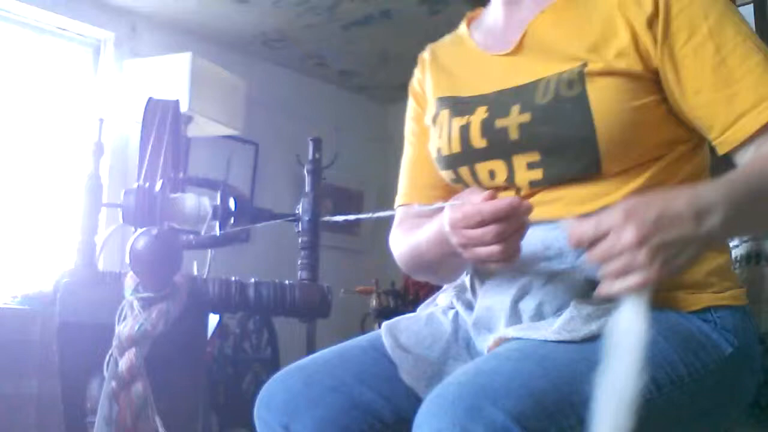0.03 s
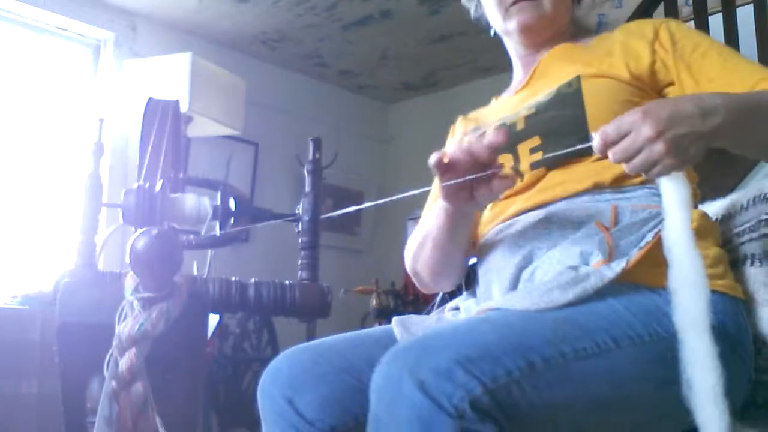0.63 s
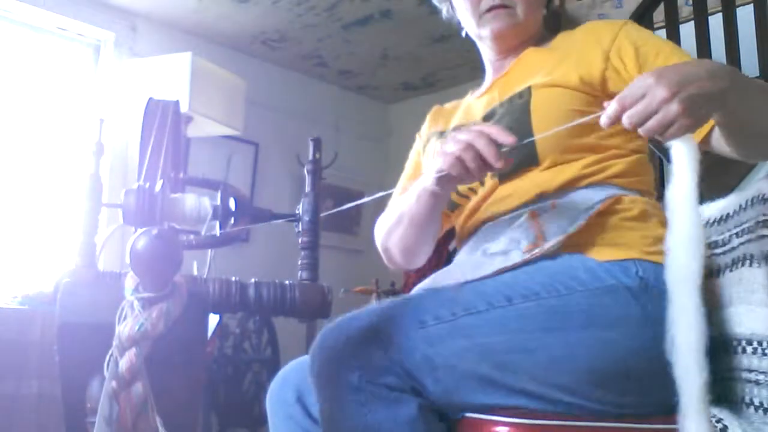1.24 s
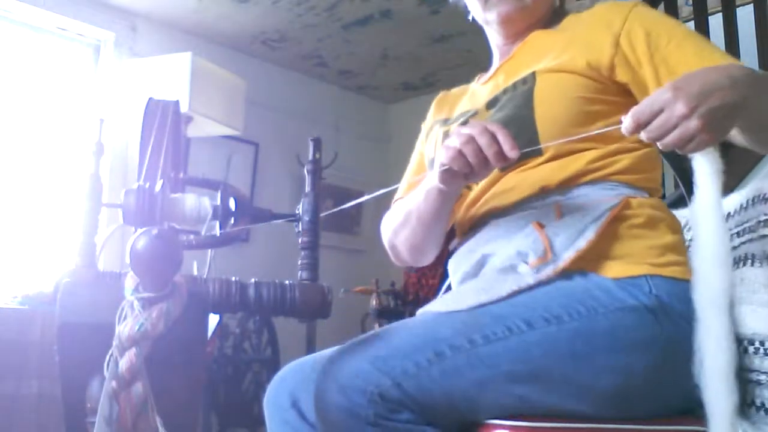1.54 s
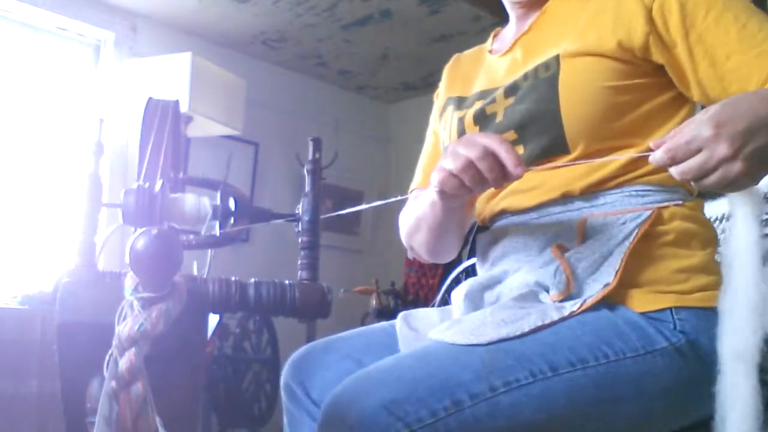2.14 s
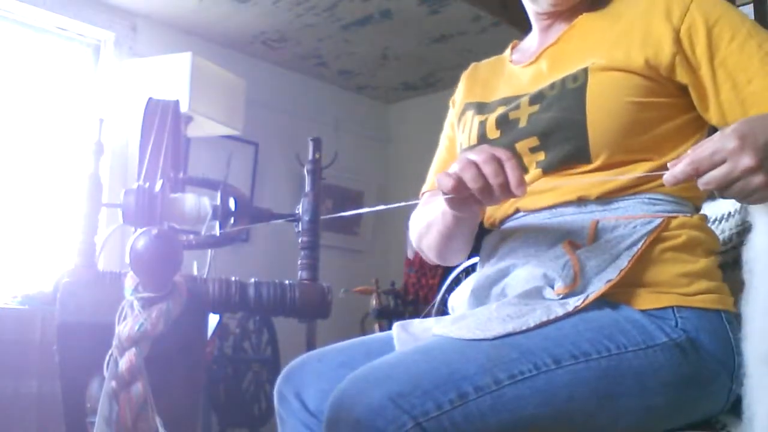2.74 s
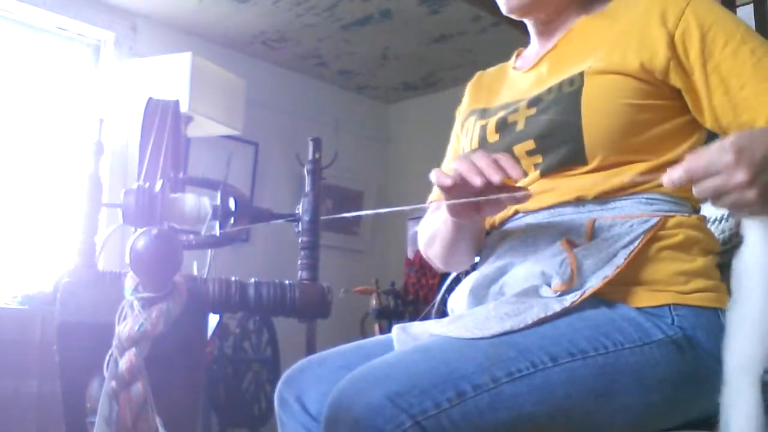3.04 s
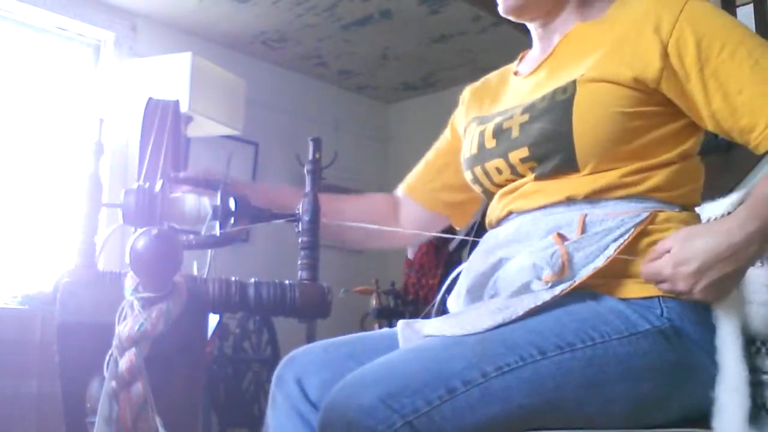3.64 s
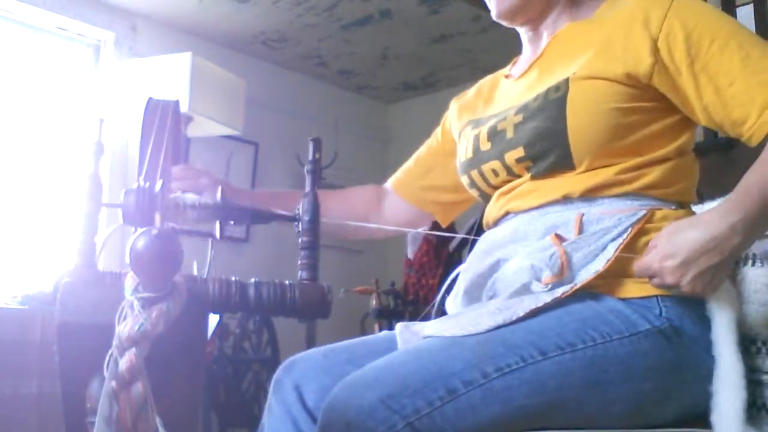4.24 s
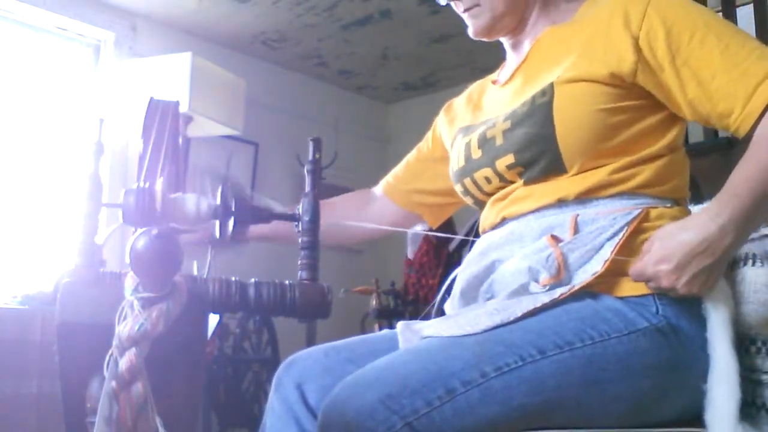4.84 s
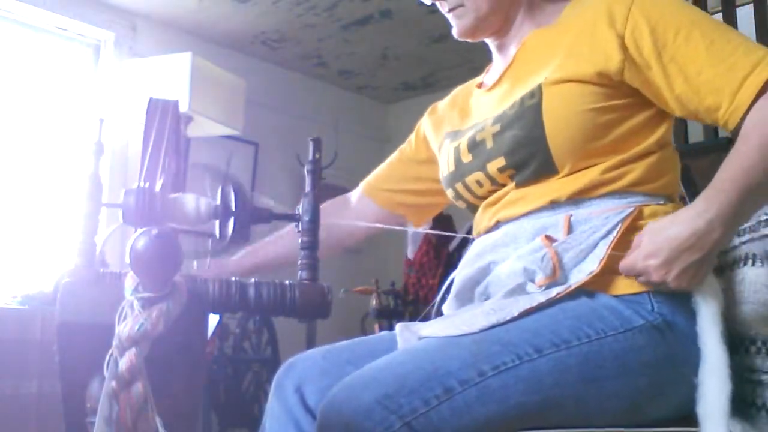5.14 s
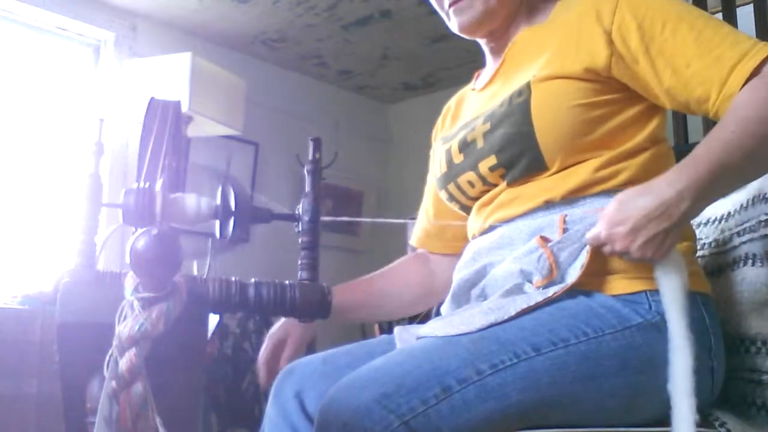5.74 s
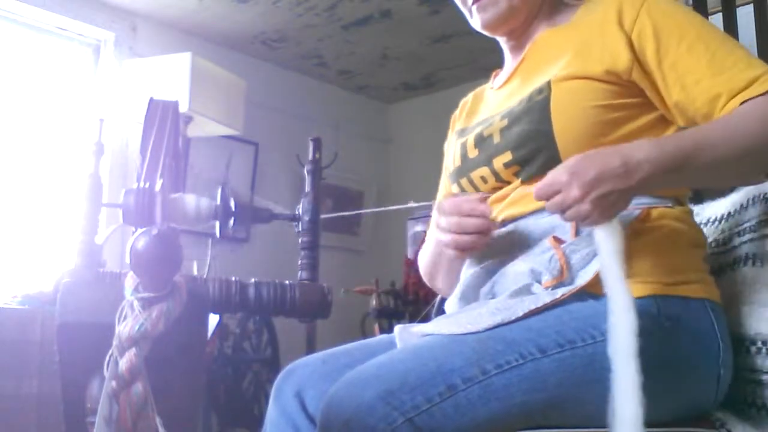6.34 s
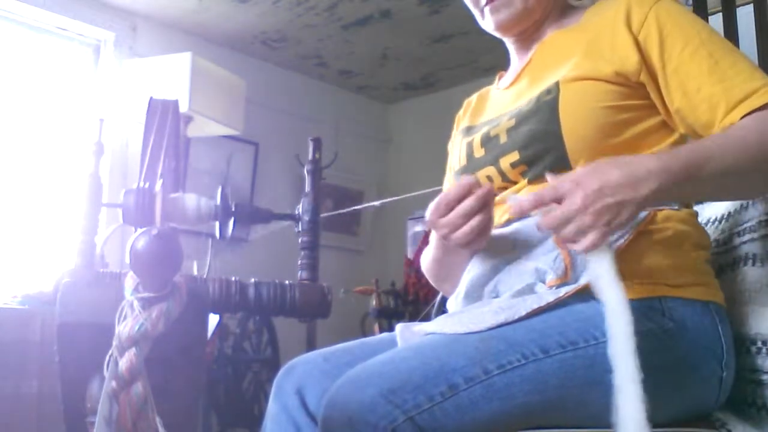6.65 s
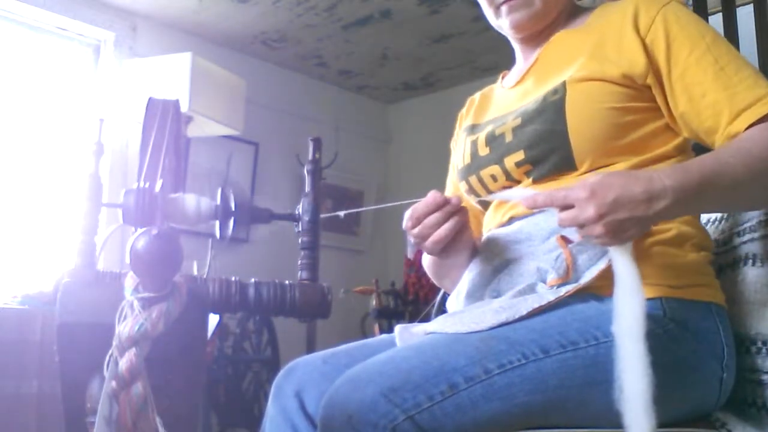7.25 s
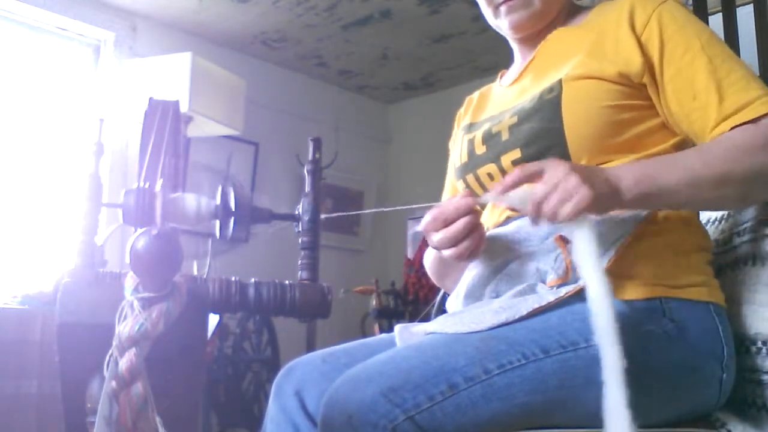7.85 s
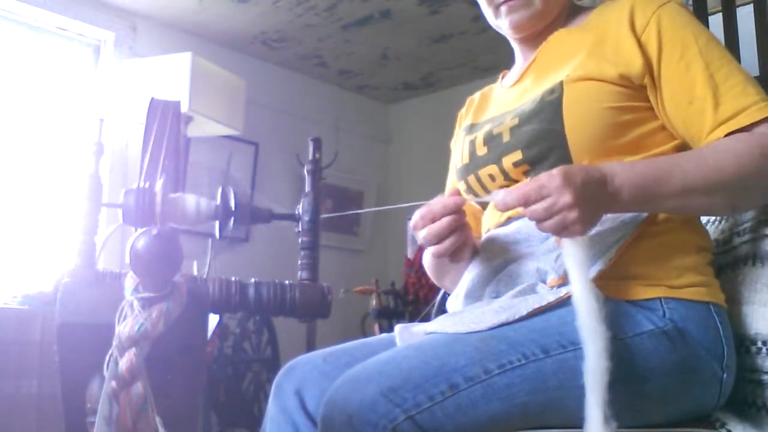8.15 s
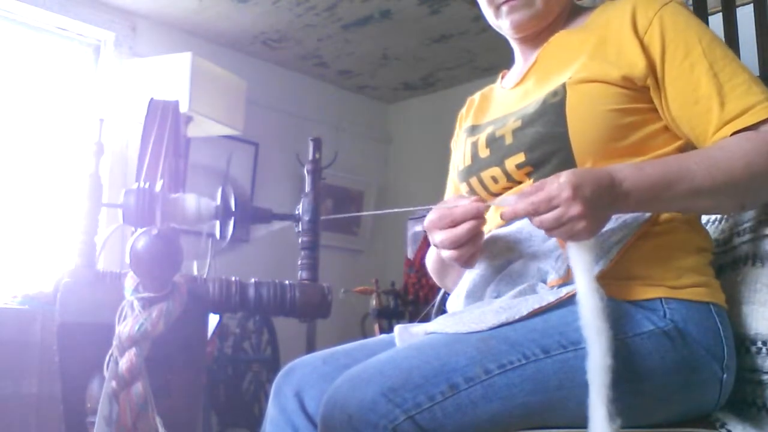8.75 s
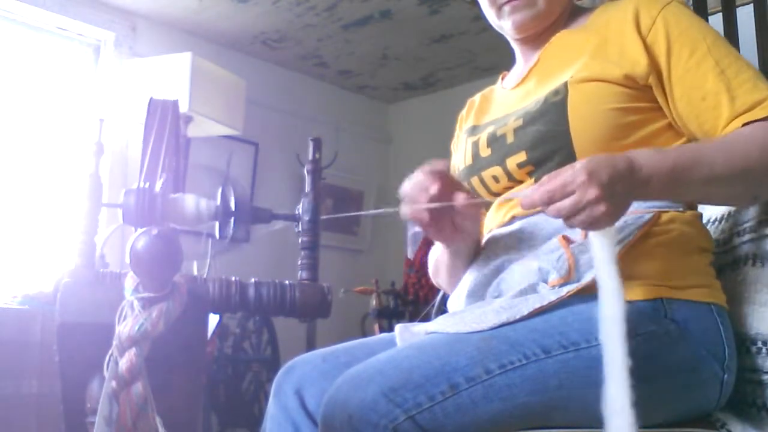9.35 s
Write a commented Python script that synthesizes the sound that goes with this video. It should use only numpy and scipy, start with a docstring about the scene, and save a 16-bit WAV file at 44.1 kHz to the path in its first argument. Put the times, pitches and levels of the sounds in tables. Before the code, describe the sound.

In a small quiet room, a low rumble and faint hiss lie under soft bumps, fingers brushing wood and yarn, and one sharp snap. About halfway through, a wooden spinning wheel starts turning, its loose parts knocking quickly and unevenly with hollow clacks and clicks. Light rattling, soft rubbing and a low drone run underneath. The wheel is about a metre from the stereo microphone, to the left.

```python
"""A small quiet room, a wooden spinning wheel about a metre from a stereo microphone and to its left. At first
there is only a low rumble, faint hiss, some handling and, near 2 s, a sharp snap. From 5 s the wheel is going
and its loose parts knock unevenly, about fifteen times a second. Each knock rings the frame and scatters round
the room. Underneath, weaker knocks patter at random, the drive band rubs and the frame drones under the load of
the treadle."""
import sys
import numpy as np
from scipy import signal
from scipy.fft import rfft, irfft
from scipy.io import wavfile
from scipy.ndimage import uniform_filter1d

SR = 44100
rng = np.random.default_rng(int(sys.argv[2]) if len(sys.argv) > 2 else 0)


def log_audio(samples):
    """Write samples as a 16-bit WAV file to the path given in sys.argv[1]."""
    # one column per channel
    frames = np.atleast_2d(samples).T
    # limit to full scale, then quantise
    limited = np.clip(frames, -1, 1)
    pcm = np.round(limited * 32767).astype(np.int16)
    wavfile.write(sys.argv[1], SR, pcm)


N = 423360
TIME = np.arange(N) / SR
RING_TIME = np.arange(int(SR * .6)) / SR

# How hard the wheel runs, idling and then driven. Each row: time in seconds, running level in dB.
IDLING = [(1.0, -59), (1.66, -65.5), (1.93, -61.5), (2.6, -68.5), (3.31, -66.5), (4.9, -62.5)]
DRIVEN = [(5.25, -51), (6.47, -50), (6.69, -47.5), (7.39, -48), (7.85, -51.5), (8.49, -47), (9.08, -49),
          (9.55, -51.5)]
# How the steady sounds follow the wheel. Each holds: level in dB at a running level of -60 dB,
# dB gained per dB of running, dB added under full load.
RUMBLE_LAW = (-60, 0.036, 3.47)
RUB_LAW = (-59.5, 0.81, -3.5)
DRONE_LAW = (-72.5, 0.45, 11.7)
HISS_LAW = (-61, 0.46, 0.7)
RATTLE_LAW = (-59.5, 0.88, -6)
# Tone of the noises and of the room's echoes. Each row: frequency in Hz, relative level in dB.
RUMBLE_COLOUR = [(25, -53), (45, -17), (65, -8), (95, -0.5), (150, -3), (200, -6), (300, -8.5),
                 (450, -14.5), (700, -27.5), (1500, -46.5)]
RUB_COLOUR = [(150, -15), (350, 4), (600, 2), (1000, -0.5), (1500, -5.5), (2800, -10), (4300, -13.5),
              (6000, -18.5), (14000, -24.5)]
HISS_COLOUR = [(1000, 4.5), (4000, 1.5), (6000, -3.5), (8000, -0.5), (11000, 0), (14500, -2.5)]
BRUSH_COLOUR = [(500, 0.5), (1300, -9.5), (2300, -9), (3200, -8.5), (4500, -12), (7000, -19), (14000, -27)]
ROOM_COLOUR = [(100, 6), (400, 4), (600, 0.5), (800, -1), (1100, -4), (1500, -0.5), (2500, 8.5),
               (4300, 2.5), (5500, 3.5), (10000, 8.5)]
# The room's decay. Each row: frequency in Hz, seconds to fall 60 dB.
ROOM_T60 = [(200, 1), (530, 1.01), (1400, 0.2354), (3700, 0.32), (10000, 0.43)]
# Near surfaces and a wall. Each row: delay in seconds, level in dB against the direct sound.
REFLECTIONS = [(.0042, -17.5), (.0072, -20.5), (.036, -24)]

# Dull bumps, sharp snaps and thin ticks. Each row: start in seconds, strength in dB.
BUMPS = [(.825, -56), (1.883, -64), (1.943, -55.5), (1.953, -63), (3.243, -60.5), (4.018, -61)]
SNAPS = [(1.9408, -53.5), (1.9516, -58), (1.954, -53), (1.956, -59)]
TICKS = [(5.572, -63.5), (6.936, -71), (7.366, -63)]
# Fingers on wood and yarn, and squeaky rubs. Each row: peak in seconds, half-width in seconds, level in dB.
BRUSHES = [(.86, 0.089, -64), (1.053, 0.36, -63), (3.283, 0.065, -60.5), (4.045, 0.045, -66),
           (4.56, 0.094, -57.5)]
SQUEAKS = [(3.318, .055, -71), (3.45, .04, -72)]
# Knocks of the loose parts. Each row: start in seconds, strength in dB, hardness (click over body) in dB,
# ping over click in dB, brightness (lifts the top edge) in dB, directness from 0 to 1, body pitch in Hz.
KNOCKS = [(4.0159, -61.5, -13, -8, -26, 0.9, 1000), (4.6512, -55.5, -19, -10, -30, 0.73, 940),
          (4.843, -56, -12, -5, -28, 0.66, 1000), (4.9992, -42.5, -12.5, -5, -17, 0.44, 1040),
          (5.0827, -48, -37, -9.0, -22.0, 1, 925), (5.129, -43, -12, -12, -18.0, 0.5, 1050),
          (5.2473, -42.5, -8, 1.5, -11.5, 0.36, 920), (5.278, -44.5, -10, -11, -21, 0.8, 980),
          (5.3361, -38.5, -15, -11, -22, 0.67, 1040.0), (5.476, -53.0, -37, -3.0, -30.0, 0.7, 980.0),
          (5.5322, -43, -32, -1, -22.0, 0.2, 1190), (5.5406, -55.5, 5, 3, -11, 0.67, 1130),
          (5.572, -37.5, -8, -16, -15, 0.47, 1030), (5.684, -55, -13.0, -9.0, -27.0, 1, 1080),
          (5.7104, -40, -13.5, -10.0, -19.0, 0.68, 1100), (5.8415, -42.5, -2.5, -5.0, -16, 0.73, 1110),
          (5.9135, -48.5, -27, -6, -14.0, 0.9, 1140.0), (5.9636, -52, -24, -12.0, -22.0, 0.8, 1030.0),
          (5.9884, -38, -6.5, -20, -33, 0.7, 1040), (6.021, -49, -10, 1, -19.0, 0.8, 960.0),
          (6.066, -38.5, -8.5, -16, -28, 0.6, 1040), (6.1103, -45, -9.5, -11, -17, 0.7, 1140),
          (6.1595, -47.0, 0.5, -4.0, -11, 0.64, 1070.0), (6.1854, -41.5, -18.0, -8, -22.0, 0.2, 990),
          (6.2791, -41.0, -19.5, -2, -17.0, 0.2, 1120.0), (6.364, -39.5, -8.5, -9, -20, 0, 1080),
          (6.419, -45, -7.5, -8.0, -15, 0.63, 1080), (6.521, -38, -6, 0.5, -9.5, 0.73, 944),
          (6.564, -42.5, -27, -4.0, -22.0, 0.34, 1090), (6.618, -39, -11.5, 2, -10, 0.44, 945),
          (6.6543, -38.5, 1.5, -1.5, -16, 0.69, 1080), (6.744, -39, -8, -17, -26, 0.65, 1010),
          (6.7733, -43.0, -4.5, -3.5, -18.0, 0.68, 1060), (6.8061, -48.5, -10.0, -5.0, -9.0, 0.8, 1100),
          (6.8314, -41.5, -20.0, -8.0, -22.0, 0, 1030.0), (6.898, -43, -30.0, -6.0, -20.0, 0.3, 975),
          (6.972, -42.5, -4.5, -6.5, -16, 0.83, 1030.0), (7.044, -40, -1.5, -6, -14.5, 0.78, 1030.0),
          (7.1151, -42, -6, -4, -20.0, 0.82, 1030.0), (7.178, -41, -9, -4, -8.5, 0.5, 926),
          (7.253, -43.0, -12, -14, -23, 0.7, 1030.0), (7.316, -36.5, -4.5, -15, -32, 0.7, 1040),
          (7.354, -44, -13, 3, -6, 0.4, 865), (7.3963, -40.5, -4.5, -8, -17, 0.48, 910),
          (7.4765, -43.5, -4, 0, -12, 0.3, 1000), (7.5558, -55, -8, -7, -9, 0.7, 910),
          (7.6437, -46, -8.5, 3, -8, 0.57, 1150), (7.7225, -48.5, -18.0, 2, -13.0, 0.27, 1170),
          (7.813, -55, -42, -4.0, -4, 0.3, 1130), (8.0173, -45.5, -42.0, 0, -22.0, 0, 1030.0),
          (8.112, -46, -40, -5.0, -22.0, 0.4, 1020.0), (8.1285, -47, -10, -5.0, -15.0, 0.3, 1110),
          (8.214, -44.5, -17, -2, -18.0, 0.73, 1120.0), (8.269, -56, -14, -5.0, -8.0, 1, 1140.0),
          (8.302, -47.5, -17, -10, -14, 1, 1060), (8.3544, -45.0, -0.5, -8.5, -22, 0.85, 1010.0),
          (8.425, -50.5, -18.0, -11, -22.0, 0.43, 1140), (8.473, -42.5, -29.0, -9.0, -22.0, 0.7, 1030.0),
          (8.5494, -41, -21, -10.0, -22.0, 0.52, 1030), (8.59, -51, -11, -2, -6.0, 0.4, 1030),
          (8.628, -45, -28.0, -7.0, -22.0, 0.44, 1060), (8.6655, -43, -9.5, -7, -19.0, 0.76, 1100),
          (8.744, -41.5, -11, -10, -16, 0.68, 1150), (8.821, -43.5, -7.5, -5, -18, 0.68, 1190),
          (8.878, -39.5, -8.0, -10, -17, 0.63, 1160), (8.973, -41, -9.5, -11, -24.0, 0.56, 1100.0),
          (8.997, -38.5, -9.5, -0.5, -12.5, 0.72, 1090), (9.069, -38, -6, -19, -20.0, 0.66, 1070),
          (9.163, -38.5, -19.0, -15, -23.0, 0.55, 1040.0), (9.27, -46, -9, -5, -13, 0.7, 990),
          (9.3727, -45, -9, -6, -16.0, 0.52, 1050), (9.4741, -54.5, -11, -6, -32, 0.85, 920),
          (9.569, -51.5, -12.5, 0, -8, 0.46, 1030)]
# Pushes of the treadle. Each row: peak in seconds, half-width in seconds, pitch in Hz, level in dB.
TREADLE_PUSHES = [(4.804, 0.18, 118, -63), (6.55, 0.74, 133, -60), (9.0, 0.37, 95, -57)]

# Resonances of the loaded frame and the small sounds. Each row: pitch in Hz, width in Hz, relative dB.
DRONE_MODES = [(103.7, 14, -0.5), (121.3, 15, 0), (139.7, 9.3, -1.5), (238.6, 34, 0), (576, 42, -11.5)]
BUMP_MODES = [(179, 230, 2), (442, 570, -4), (900, 1370, -10)]
SNAP_MODES = [(2750, 1100, -9), (3760, 400, 2), (4060, 500, 0), (5960, 5900, -16)]
TICK_MODES = [(6000, 3300, -4), (8500, 2700, -3), (10100, 1700, 2)]
SQUEAK_MODES = [(2670, 260, 0)]
# Resonances of a knock, low thud to top edge. Each row: pitch in Hz, width in Hz, relative dB.
THUD_MODES = [(286, 170, -11.5), (465, 327, 3.5), (540, 100, 4), (650, 126, 4.5)]
HOLLOW_MODES = [(880, 260, -1), (1030, 442, 10.5), (1180, 200, 1.5)]
CLACK_MODES = [(1632, 270, -1), (1867, 340, -2), (1570, 1170, -7)]
CLICK_MODES = [(2263, 210, -3.5), (2540, 210, -4), (3137, 590, 0), (3500, 550, -5.5), (3730, 900, -8.5),
               (2950, 2160, -7)]
PING_MODES = [(4030, 410, 3), (4250, 490, -4)]
EDGE_MODES = [(4500, 350, 4.5), (5040, 940, 4), (5900, 3200, -3.5), (6770, 1200, -3.5), (8120, 2900, -12)]
# Long rings of the wooden frame. Each row: pitch in Hz, relative level in dB, seconds to fall 60 dB.
FRAME_MODES = [(128, -14, 0.68), (242.1, 0.5, 0.36), (326, -14.5, 0.62), (416.6, -8.5, 0.2),
               (489, -0.5, 0.094), (569.4, -1.5, 0.24), (654, -4.5, 0.18), (741, -5, .16), (810.4, 0, 0.18),
               (838, -6, 0.17), (913, -5, 0.14), (988, 1, 0.19), (1182, 6, 0.097), (1244.6, 4, 0.18),
               (1312, -3, 0.21), (1700, -2, 0.1), (1900, -9, 0.13), (2202, -7, 0.17), (2285, -6, 0.11),
               (2490, -14, 0.25), (2505, -9, 0.15), (3156, -5, 0.16), (3397, -13, 0.12)]


def undb(db):
    """Decibels to gain."""
    return 10 ** (np.asarray(db) / 20)


def unit_rms(x):
    """Scale to rms 1."""
    return x / np.sqrt(np.mean(x ** 2))


def unit_energy(x):
    """Scale a response to energy 1."""
    return x / np.sqrt(np.sum(x ** 2))


def read_curve(points, hz):
    """Join rows of frequency and value on a log-frequency axis."""
    point_hz, value = np.transpose(points)
    return np.interp(np.log(np.maximum(hz, 1)), np.log(point_hz), value)


def colour(x, points):
    """Filter by rows of frequency and dB."""
    n = x.shape[-1]
    return irfft(rfft(x) * undb(read_curve(points, np.fft.rfftfreq(n, 1 / SR))), n)


def resonate(x, modes):
    """Parallel resonances, each applied twice for steep skirts."""
    out = 0
    for hz, width, db in modes:
        b, a = signal.iirpeak(hz, hz / width, fs=SR)
        out = out + undb(db) * signal.lfilter(b, a, signal.lfilter(b, a, x))
    return out


def convolve(x, response):
    """Play a mono sound through a two-channel response."""
    return signal.oaconvolve(x[None], response, axes=1)[:, :N]


def diffuse_noise(n, alike_hz):
    """Noise from all round the microphone: left and right alike in the bass, unrelated in the treble."""
    hz = np.fft.rfftfreq(n, 1 / SR)
    alike = .77 / (1 + (hz / alike_hz) ** 4)
    mid, side = irfft(rfft(rng.standard_normal((2, n))) * np.sqrt([1 + alike, 1 - alike]), n)
    return np.array([mid + side, mid - side])


def wander(rate_hz):
    """A random drift with rms 1."""
    step = int(SR / rate_hz)
    held = np.repeat(rng.standard_normal(N // step + 1), step)
    return unit_rms(uniform_filter1d(held, step)[:N])


def swell(peak_s, half_width_s, db):
    """A bell-shaped rise and fall in gain."""
    return undb(db) * np.exp(-((TIME - peak_s) / half_width_s) ** 2)


def follow_wheel(law, times=TIME, load_start_s=3.9, load_rise_s=1):
    """Level in dB of a sound that follows the wheel's running and the load taken up by the treadle."""
    db, slope, loaded_db = law
    running_db = np.interp(times, *np.transpose(IDLING + DRIVEN))
    load = np.clip((times - load_start_s) / load_rise_s, 0, 1)
    return db + slope * (running_db + 60) + loaded_db * load


def strike(times, db, modes, stretch=1, detune=0.009, spot_db=5.0, slip_s=0.001563, rebound=0.32):
    """Blows into damped resonances; db is the rms over 30 ms and stretch scales the pitch."""
    size = 1024
    hz = np.fft.rfftfreq(size, 1 / SR) + 1e-6
    pitch, slip, *spots = rng.uniform(-1.021, 1, (len(times), 2 + len(modes), 1)).transpose(1, 0, 2)
    tuned_hz = hz * np.exp(2 * detune * pitch) / np.reshape(stretch, (-1, 1))
    power = 0
    # each contact spot favours other resonances
    for (mode_hz, width, mode_db), spot in zip(modes, spots):
        off_centre = (tuned_hz / mode_hz - mode_hz / tuned_hz) * mode_hz / width
        power = power + undb(mode_db + spot_db * spot) ** 2 / (1 + off_centre ** 2) ** 3
    # minimum phase puts the crack at the start and lets the resonances ring after it
    cepstrum = irfft(np.log(power + 1e-9) / 2, size)
    causal = np.r_[1, np.full(size // 2 - 1, 2), 1, np.zeros(size // 2 - 1)]
    spectra = np.exp(rfft(cepstrum * causal))
    # the parts chatter: a weaker contact follows within a few milliseconds
    chatter = 1 + rebound * np.exp(-2j * np.pi * hz * slip_s * (1 + slip / 2))
    out = np.zeros(N + size)
    for start_s, level, blow in zip(times, db, irfft(spectra * chatter, size)):
        start = int(start_s * SR)
        out[start:start + size] += undb(level) * np.sqrt(.03 * SR) * unit_energy(blow)
    return out[:N]


def rumble():
    """A low, nearly even rumble that rises a little under load."""
    noise = unit_rms(colour(diffuse_noise(N, alike_hz=830), RUMBLE_COLOUR))
    return noise * undb(follow_wheel(RUMBLE_LAW) + 0.11 * wander(rate_hz=21))


def drive_band():
    """The band rubs softly and unevenly, louder the harder the wheel runs."""
    noise = unit_rms(colour(diffuse_noise(N, alike_hz=624), RUB_COLOUR))
    return noise * undb(follow_wheel(RUB_LAW) + 2.1 * wander(rate_hz=19))


def hiss(ceiling_db=-60):
    """A faint hiss, unrelated left and right, a little stronger while the wheel runs."""
    noise = unit_rms(colour(rng.standard_normal((2, N)), HISS_COLOUR))
    return noise * undb(np.minimum(follow_wheel(HISS_LAW), ceiling_db))


def room(build_s=0.003, early_db=-1, early_s=0.013):
    """The room's echoes: dense, strongest from the near surfaces, the bass lasting longest."""
    noise = rfft(diffuse_noise(len(RING_TIME), alike_hz=756))
    octave = np.log2(np.maximum(np.fft.rfftfreq(len(RING_TIME), 1 / SR), 1))
    tail = 0
    for centre in range(6, 15):
        band = irfft(noise * np.maximum(1 - abs(octave - centre), 0), len(RING_TIME))
        tail = tail + band * np.exp(-np.log(1000) * RING_TIME / read_curve(ROOM_T60, 2 ** centre))
    build_up = 1 - np.exp(-(RING_TIME / build_s) ** 2)
    early_lift = 1 + undb(early_db) * np.exp(-RING_TIME / early_s)
    return colour(unit_energy(tail * build_up * early_lift), ROOM_COLOUR)


def handling():
    """Handling bumps the wheel, heard mostly by way of the room; bright snaps and ticks sound closer."""
    snaps = strike(*np.transpose(SNAPS), SNAP_MODES, detune=0.0059)
    ticks = strike(*np.transpose(TICKS), TICK_MODES)
    bumps = strike(*np.transpose(BUMPS), BUMP_MODES, detune=0.076)
    direct = undb(-1) * (snaps + ticks) + undb(-3) * bumps
    scattered = undb(-4) * (snaps + ticks) + undb(3) * bumps
    return direct + convolve(scattered, room())


def brushes():
    """Fingers brush wood and yarn at the flyer in soft, uneven swishes."""
    noise = unit_rms(colour(rng.standard_normal((2, N)), BRUSH_COLOUR))
    return noise * sum(swell(*row) for row in BRUSHES) * undb(2.0 * wander(rate_hz=110))


def squeaks():
    """Faint dry squeaks: rubbing catches in one narrow resonance and flutters."""
    noise = unit_rms(resonate(rng.standard_normal((2, N)), SQUEAK_MODES))
    return noise * sum(swell(*row) for row in SQUEAKS) * undb(2.2 * wander(rate_hz=60))


def knocks(usual_hollow_hz=1040, hollow_lag_s=0.00087):
    """Wood on wood: blows pop the hollow body, hard ones click and ping. Many weaker knocks join in at random."""
    times, knock_db, hard_db, ping_db, bright_db, directness, hollow_hz = np.transpose(KNOCKS)
    click_db = knock_db + hard_db
    body = strike(times + hollow_lag_s, knock_db, HOLLOW_MODES, stretch=hollow_hz / usual_hollow_hz,
                  detune=0, spot_db=7.5, slip_s=0.00195, rebound=0.12)
    # a harder contact is shorter and reaches higher
    ping = strike(times, click_db + ping_db, PING_MODES, detune=0.008, spot_db=3.0)
    clack = strike(times, knock_db - 4 + 0.46 * hard_db, CLACK_MODES, detune=0.034)
    click = strike(times, click_db + 0.6, CLICK_MODES, detune=0.021, spot_db=5.5)
    edge = strike(times, click_db + 3.5 + bright_db, EDGE_MODES, detune=0.02)
    crack = clack + click + ping + edge
    thud = strike(times, knock_db - 15.5, THUD_MODES)  # the lows come late, by way of the floor
    rattle = weak_knocks()
    # parts that face away reach the microphone mostly by way of the room
    latest_knock = np.maximum(np.searchsorted(times, TIME + .001) - 1, 0)
    direct_share = np.clip(directness, .15, .9)[latest_knock]
    direct = (undb(-0.58) * body + crack) * np.sqrt(direct_share) + undb(-4.5) * rattle
    scattered = (undb(-0.4) * body + crack) * np.sqrt(1 - direct_share) + thud + undb(0.5) * rattle
    near = from_left(add_reflections(direct))
    # knocks take turns among three echo patterns, so their room tails vary
    echoes = sum(convolve(scattered * (latest_knock % 3 == pattern), room()) for pattern in range(3))
    low_shake = strike(times, knock_db - 8, [(686, 2730, 0)])
    high_shake = strike(times, click_db, [(3020, 2500, 0)])
    ringing = convolve(low_shake + high_shake, frame_ring())
    return undb(-0.94) * near + undb([[5], [4]]) * echoes + undb(-2) * ringing


def add_reflections(x):
    """The sound followed by its first bounces off the nearest surfaces."""
    return x + sum(undb(db) * np.interp(TIME - delay, TIME, x, left=0) for delay, db in REFLECTIONS)


def from_left(x, lag_s=.000075, shade_db=8.5):
    """The wheel stands to the left: the microphone's right side hears it later and with less treble."""
    hz = np.fft.rfftfreq(N, 1 / SR)
    shade = shade_db * read_curve([(500, 0), (3500, 1)], hz)
    left = undb(shade / 2)
    right = undb(-shade / 2) * np.exp(-2j * np.pi * hz * lag_s)
    return irfft(rfft(x) * np.array([left, right]), N)


def frame_ring(rise_s=0.0014):
    """The struck frame rings on; each mode reaches left and right with its own phase."""
    out = 0
    for hz, db, t60 in FRAME_MODES:
        phase = rng.uniform(0, 2 * np.pi) - np.array([[0], [min(hz / 1000, 1.5)]])
        decay = np.exp(-np.log(1000) * RING_TIME / t60)
        out = out + undb(db) * np.sin(2 * np.pi * hz * RING_TIME + phase) * decay
    return unit_energy(out * (1 - np.exp(-RING_TIME / rise_s)))


def frame_drone():
    """The frame's low resonances come up in a drone once the wheel is driven hard."""
    noise = unit_rms(resonate(diffuse_noise(N, alike_hz=900), DRONE_MODES))
    return noise * undb(follow_wheel(DRONE_LAW))


def treadle_booms(width_hz=45):
    """The frame booms softly under a hard push of the treadle."""
    out = 0
    for peak_s, half_width_s, hz, db in TREADLE_PUSHES:
        boom = unit_rms(resonate(diffuse_noise(N, alike_hz=900), [(hz, width_hz, 0)]))
        out = out + boom * swell(peak_s, half_width_s, db)
    return out


def weak_knocks(start_s=5, end_s=9.55, taps=150):
    """Many weaker knocks of the loose parts, played as light random taps, louder the harder the wheel runs."""
    times = np.sort(rng.uniform(start_s, end_s, size=taps))
    db = follow_wheel(RATTLE_LAW, times) + np.clip(14.0 * rng.standard_normal(taps), -8, 6)
    body = strike(times, db - 6.5, HOLLOW_MODES, stretch=0.854, detune=0.12)
    clack = strike(times, db - 18.5, CLACK_MODES, detune=0.06)
    return body + clack


def scene():
    """Wheel, hands and hiss as they reach the microphone."""
    return (knocks() + handling() + rumble() + drive_band() + frame_drone() + treadle_booms()
            + brushes() + squeaks() + hiss())


def record(dry, open_s=.815, fade_s=.005, top_hz=14700):
    """The microphone opens after a short silence; the highest treble is cut off steeply."""
    opened = dry * np.clip((TIME - open_s) / fade_s, 0, 1)
    lowpass = signal.ellip(10, .2, 70, top_hz, fs=SR, output="sos")
    return signal.sosfilt(lowpass, opened)


dry = scene()
out = record(dry)
log_audio(out)
```